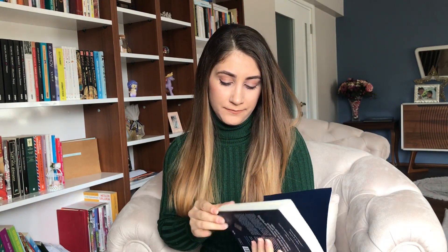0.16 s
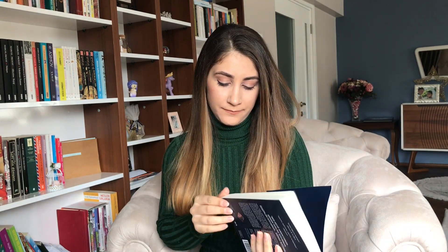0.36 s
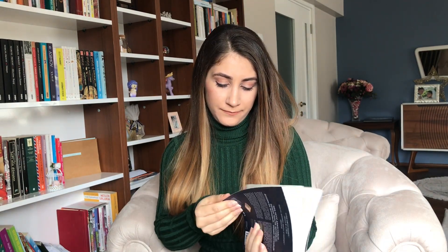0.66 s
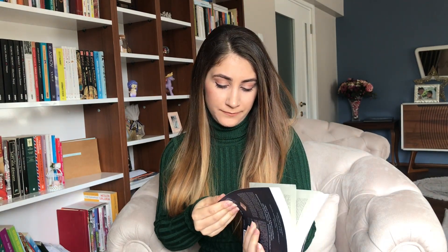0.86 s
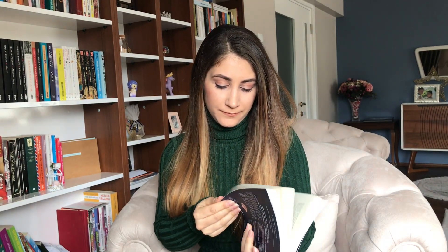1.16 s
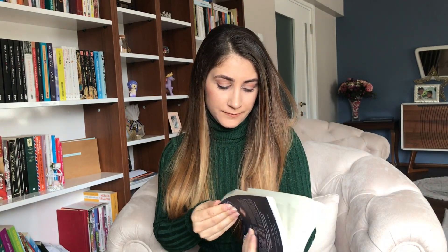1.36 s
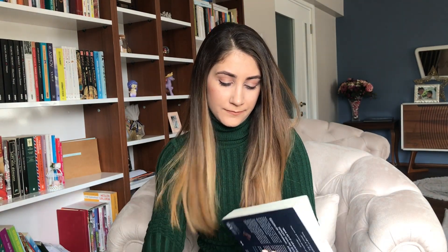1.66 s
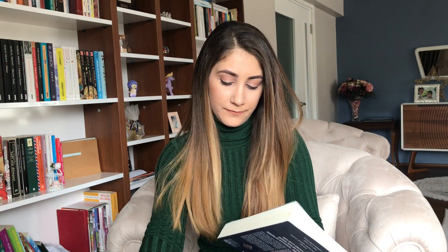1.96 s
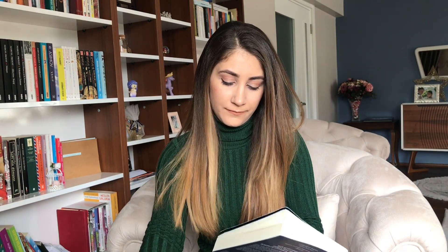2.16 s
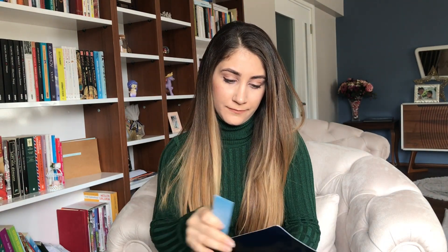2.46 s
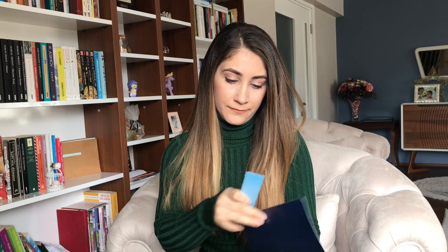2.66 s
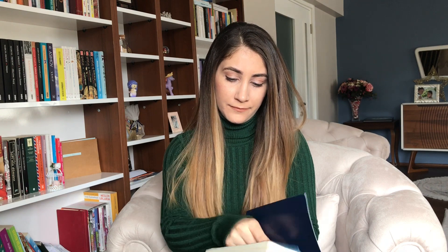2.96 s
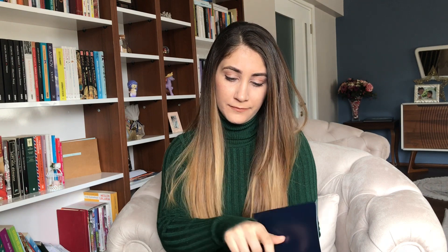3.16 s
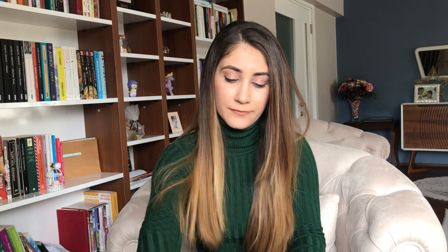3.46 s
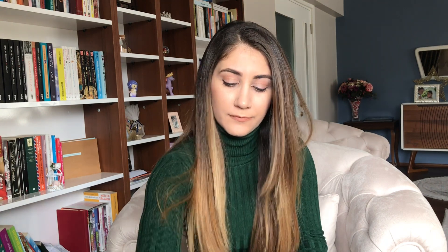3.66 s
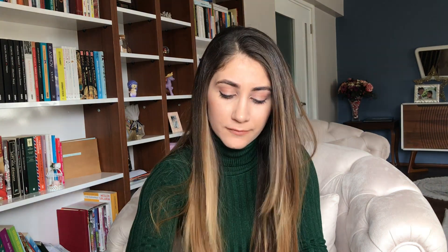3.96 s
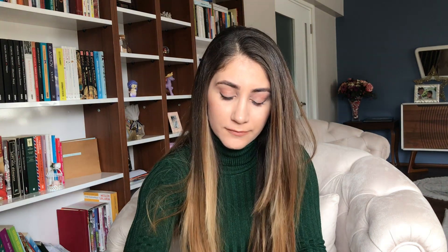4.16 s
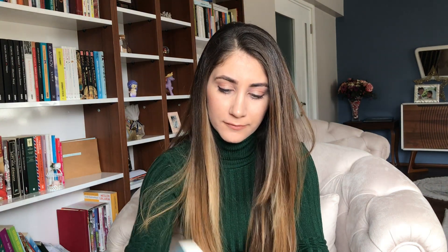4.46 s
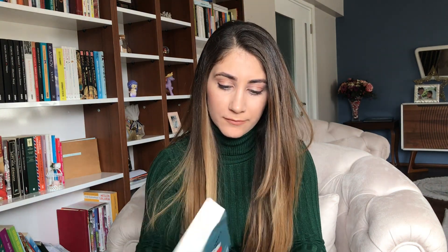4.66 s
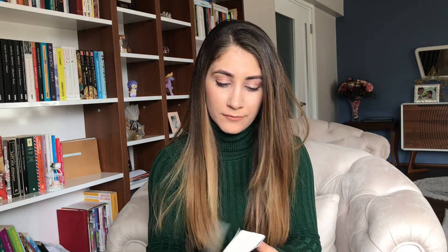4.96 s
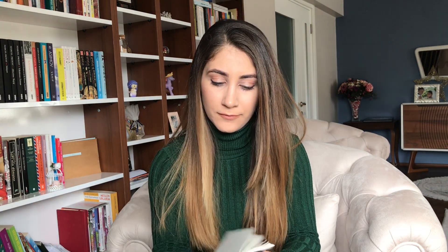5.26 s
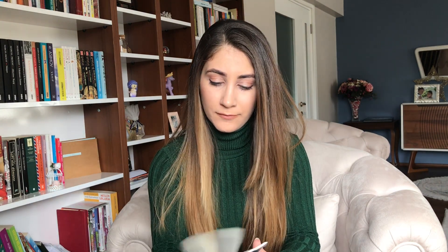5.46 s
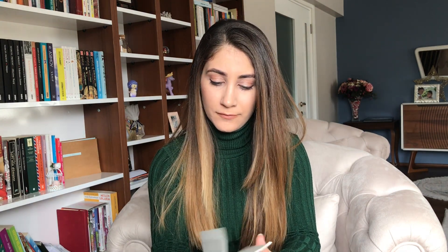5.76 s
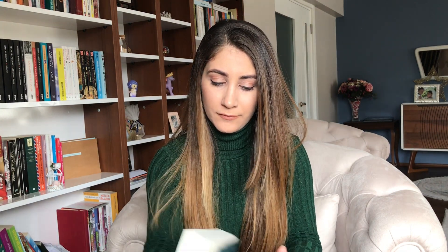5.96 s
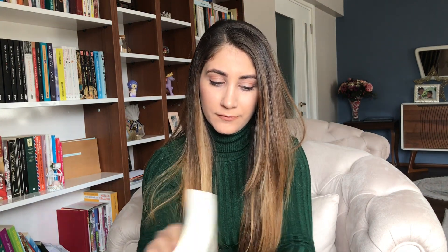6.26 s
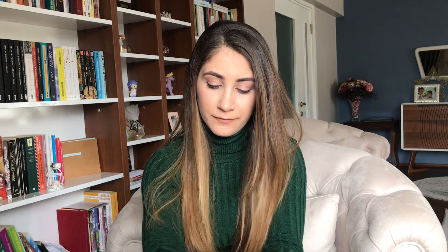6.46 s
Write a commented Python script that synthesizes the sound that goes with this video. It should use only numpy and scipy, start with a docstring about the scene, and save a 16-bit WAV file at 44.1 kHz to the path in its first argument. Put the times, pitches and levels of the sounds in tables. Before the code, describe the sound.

A paperback is leafed through, snapped shut and slid aside, another is handled quietly, ending with a heavy knock over faint low rumble.

```python
"""In a quiet living room a paperback is leafed through, shut and laid aside, and another book is picked up.
Paper and covers slide with a grainy hiss: random slips filtered by the resonances of sheet and cover.
Page edges snap as short cracks with damped cover modes; tiny ticks and narrow noise bands add bright detail.
The books bump as heavily damped swings, once with a loud thump and a low modal ring.
One echo and a sparse decaying tail answer each sound, over a steady low rumble of shaped noise."""
import sys
import numpy as np
from scipy import signal
from scipy.fft import rfft, irfft
from scipy.io import wavfile

SR = 44100
rng = np.random.default_rng(int(sys.argv[2]) if len(sys.argv) > 2 else 0)


def bounce(signal):
    """Save signal as a 16-bit WAV file at the path given by the first command-line argument."""
    frames = np.transpose(np.atleast_2d(signal))
    limited = np.clip(frames, -1, 1)
    pcm = np.round(limited * 32767).astype(np.int16)
    wavfile.write(sys.argv[1], SR, pcm)


N = 291501

# spectrum of a paper edge, struck or brushed: frequency_hz, density_db (per Hz)
EDGE_SPECTRUM = [(200, -21), (900, -5.5), (2000, -5.5), (3000, 3), (4500, -1), (6300, 1.5), (7600, -4),
                 (13000, -4.5), (16000, -9)]


def gain_of(db):
    """Level law: decibels to an amplitude ratio."""
    return 10 ** (np.asarray(db) / 20)


def evened(x):
    """Power normalization: scales a signal to an rms of one."""
    return x / np.sqrt(np.mean(x ** 2) + 1e-20)


def read(points, hz):
    """Interpolation of a spectrum on a log-frequency axis."""
    table_hz, value = np.transpose(points)
    return np.interp(np.log(hz + 1), np.log(table_hz + 1), value)


def add(mix, start_s, sound):
    """Superposition: adds a sound to the mix from its start time, cut at the end of the mix."""
    part = mix[max(round(start_s * SR), 0):][:len(sound)]
    part += sound[:len(part)]  # a view, so the mix itself changes


def seconds(length_s):
    """Time axis of a short sound."""
    return np.arange(max(int(length_s * SR), 2)) / SR


def coloured(x, points, tilt=0, sheet_hz=1000, sheet_db=0, sheet_octaves=0.31):
    """Linear filtering: a spectrum, a tilt in dB per octave above 1 kHz and one broad resonance; rms one."""
    hz = np.fft.rfftfreq(len(x), 1 / SR)
    octaves = np.log2(np.maximum(hz, 1000) / 1000)
    resonance = sheet_db * np.exp(-(np.log2((hz + 1) / sheet_hz) / sheet_octaves) ** 2)
    response_db = read(points, hz) + tilt * octaves + resonance
    return evened(irfft(rfft(x) * gain_of(response_db), len(x)))


def drift(size, rate_hz):
    """Slow random modulation: Gaussian values at the given rate, joined by straight lines."""
    knots = rng.standard_normal(N // 10)
    return np.interp(np.arange(size) * rate_hz / SR, np.arange(len(knots)), knots)


def page_slides():
    """Sliding friction under load: a page catches, slides under growing pressure and lets go."""
    # start_s, length_s, hiss_db (at full pressure), fizz_db and body_db (over the hiss), sheet_hz
    slides = [(0.589, 0.17, -71.5, -5, -6, 2900), (1.098, .16, -69.5, -23, -2.5, 2850),
              (1.442, .07, -66, -6, -1.5, 2800), (1.803, 0.22, -60, -3, -15.5, 4630),
              (2.041, 0.066, -66.5, -6, -17, 4600), (2.106, 0.2, -60.5, -7, -11, 4450),
              (2.844, 0.034, -53, -1.5, -15, 6100), (2.948, 0.042, -52, -10, -6, 3000),
              (2.996, 0.041, -57.5, -11, -7, 3200)]
    catch_s, release_s = 0.0057, 0.0094
    press_db, sheet_db = 4, 7.5  # growth of level over the slide, height of the sheet resonance
    out = np.zeros(N)
    for start_s, length_s, hiss_db, fizz_db, body_db, sheet_hz in slides:
        t = seconds(length_s + 5 * release_s)
        caught = np.minimum(t / catch_s, 1)
        released = np.exp(-np.maximum(t - length_s, 0) / release_s)
        level_db = hiss_db - press_db * np.maximum(1 - t / length_s, 0)
        add(out, start_s, caught * released * rub(level_db, fizz_db, body_db, sheet_hz, sheet_db))
    return out


def drags(edge_s=0.01):
    """Speed-dependent friction: a dragged cover speeds up and slows down, and its sound swells and fades."""
    # start_s, rise_s, fall_s, hiss_db (at full speed), fizz_db and body_db (over the hiss), cover_hz
    strokes = [(2.335, .03, 0.09, -72, -14, -3, 2980), (2.77, 0.055, .06, -71.5, 1, -3, 6000),
               (3.04, 0.036, 0.25, -66.5, -3, 1.5, 3600), (3.205, 0.0092, 0.16, -59, -13, -1, 2880),
               (3.64, 0.055, 0.14, -52, -1.5, 0, 1900), (3.83, 0.056, 0.16, -59.5, -4, -2, 3800),
               (3.97, .05, 0.28, -67, -3.5, -1.5, 5200), (4.07, 0.2, 0.25, -60, -2.5, -2.5, 5000),
               (4.28, 0.098, 0.13, -62, 5.5, -12, 5740), (4.57, 0.076, 0.49, -68, 1, -2.5, 3630),
               (4.89, 0.062, 0.095, -69, -3, 3, 3630), (5.19, 0.12, 0.21, -69, -1, 1.5, 3720),
               (5.43, 0.063, 0.076, -74.5, -1, 1, 3720), (5.82, 0.12, 0.068, -66, 5, -8, 3500),
               (5.98, 0.018, 0.44, -74, 0.5, 5, 3500), (6.174, 0.012, 0.094, -64.5, 4.5, 0, 4000),
               (6.285, 0.12, 0.11, -58.5, 2, -0.5, 4400), (6.492, .006, 0.089, -54, -1.5, -7, 3650)]
    start_db, end_db = -9.5, -16  # relative to full speed
    resonance_db = 5
    out = np.zeros(N)
    for start_s, rise_s, fall_s, hiss_db, fizz_db, body_db, cover_hz in strokes:
        t = seconds(rise_s + fall_s)
        contact = np.minimum(np.minimum(t, t[-1] - t) / edge_s, 1)
        level_db = hiss_db + np.interp(t, [0, rise_s, rise_s + fall_s], [start_db, 0, end_db])
        add(out, start_s, contact * rub(level_db, fizz_db, body_db, cover_hz, resonance_db))
    return out


def rub(level_db, fizz_db, body_db, sheet_hz, sheet_db):
    """Source and filter: slips sound in the sheet and the cover, finer ones in the fibres."""
    # spectra of the sliding sheet, its fine fibres and the cover: frequency_hz, density_db (per Hz)
    hiss_spectrum = [(1200, -22), (2200, -6), (3000, 2.5), (4400, 2.5), (5200, -1), (6400, 3.5), (7600, -7),
                     (10000, -17)]
    fizz_spectrum = [(5000, -31), (7400, -2.5), (9000, 5.5), (10400, -2.5), (12300, 6.5), (14200, 3.5),
                     (16000, -2)]
    body_spectrum = [(120, -17), (280, 13.5), (450, 4), (680, 4.5), (1000, 3.5), (1400, -1.5), (2000, -3),
                     (3200, -30)]
    drive = friction(len(level_db), grain=0.27)
    fibres = friction(len(level_db), slips_per_s=450, grain=0.4)
    sound = coloured(drive, hiss_spectrum, 0, sheet_hz, sheet_db)
    sound += gain_of(fizz_db) * coloured(drive + fibres, fizz_spectrum)
    sound += gain_of(body_db) * coloured(drive, body_spectrum)
    return gain_of(level_db) * sound


def friction(size, slips_per_s=900, spread_db=3.0, grain=.5, patchy_db=2.77):
    """Stick-slip: fibres give separate tiny clicks in a smooth hiss, under uneven pressure."""
    slips = (rng.random(size) < slips_per_s / SR) * rng.choice([-1, 1], size)
    slips = slips * gain_of(spread_db * np.minimum(rng.exponential(1, size), 4))
    share = np.clip(grain, 0, 1)  # part of the power that lies in the clicks
    drive = np.sqrt(share) * evened(slips) + np.sqrt(1 - share) * rng.standard_normal(size)
    return drive * gain_of(patchy_db * drift(size, 111.3))


def brushes(rise_s=0.0029):
    """Transient friction: a page edge sweeps past in a quick burst."""
    # start_s, level_db, length_s, brightness_db (per octave)
    sweeps = [(0.008, -62, 0.012, -4), (0.068, -64, .035, -10.5), (0.223, -65.5, 0.02, 0),
              (0.716, -64.5, .025, -6), (0.793, -64, 0.017, -2.5), (1.094, -60.5, 0.013, -5.5),
              (1.426, -60.5, 0.011, -10), (1.774, -47, 0.014, 2.5), (1.79, -46, .012, 1),
              (1.976, -51, 0.024, 5), (2.106, -54.5, 0.019, 2.5), (2.187, -51, 0.025, 3),
              (2.285, -46.5, 0.027, 1.5), (2.609, -68, 0.031, -9), (3.656, -50.5, 0.05, -2.5),
              (4.384, -48, 0.018, 11), (6.58, -56, 0.024, -1)]
    sheet_hz, sheet_db = 4080, 3.5  # broad resonance of the sheet
    out = np.zeros(N)
    t = seconds(.1)
    for start_s, level_db, length_s, tilt in sweeps:
        shape = (1 - np.exp(-t / rise_s)) * np.exp(-(t / length_s) ** 4)
        rubbing = coloured(friction(len(t), grain=0.23), EDGE_SPECTRUM, tilt, sheet_hz, sheet_db)
        add(out, start_s, gain_of(level_db) * shape * rubbing)
    return out


def tick_trains(spread_db=3, low_hz=4500, high_hz=14000, tick_s=.00009):
    """Random impulse train: tiny bright ticks of differing pitch and size, dense as pages run past, sparse later."""
    # start_s, end_s, ticks_per_s, level_db (before the spread of sizes)
    trains = [(1.824, 2.05, 200, -47), (2.109, 2.29, 220, -47), (2.938, 3.102, 140, -50),
              (3.699, 4.418, 110, -52), (4.6, 5.722, 31, -54.5)]
    out, t = np.zeros(N), seconds(.003)
    for start_s, end_s, ticks_per_s, level_db in trains:
        duration_s = end_s - start_s
        for place, pitch, size in rng.random((200, 3))[:int(ticks_per_s * duration_s)]:
            hz = low_hz + (high_hz - low_hz) * pitch
            envelope = t / tick_s * np.exp(1 - t / tick_s)
            tick = envelope * np.sin(2 * np.pi * hz * t)
            tick_db = level_db + spread_db * np.log(size + 0.018)
            add(out, start_s + place * duration_s, gain_of(tick_db) * tick)
    return out


def narrow_bands():
    """Narrow-band noise: two faint squeaks near 3.7 kHz, and one short tick near 1.2 and 3.4 kHz."""
    # start_s, level_db, pitch_hz, width_octaves (from the pitch to 18 dB down), length_s
    bands = [(1.617, -81.5, 3680, 0.082, .135), (3.85, -67, 3630, 0.276, 0.073),
             (5.926, -51.5, 3400, 0.3, 0.009), (5.927, -54.5, 1210, 0.63, 0.014)]
    out = np.zeros(N)
    for start_s, level_db, hz, octaves, length_s in bands:
        t = seconds(length_s)
        spectrum = [(hz / 4 ** octaves, -50), (hz / 2 ** octaves, -18), (hz, 0),
                    (hz * 2 ** octaves, -18), (hz * 4 ** octaves, -50)]
        noise = coloured(rng.standard_normal(len(t)), spectrum)
        add(out, start_s, gain_of(level_db) * noise * signal.windows.tukey(len(t), .5))
    return out


def snaps(send_db=-1):
    """Impulsive release: an edge cracks and the cover rings. Returns the direct sound and the room's drive."""
    # start_s, crack_db (on top of the burst's own rms), ring_db, brightness_db (per octave),
    # grip (factor on the cover's pitch)
    releases = [(0.0955, -47.5, -49.5, -3.5, 0.94), (1.099, -48.5, -67, -5.5, .87),
                (1.4265, -48, -58, -8, 1.1), (1.5109, -37.5, -52.5, -4.5, 0.52),
                (1.595, -49, -59, -7, 0.71), (2.037, -39.5, -58, -2, 1.05), (2.3333, -21, -43, 2, 0.88),
                (2.342, -35, -53, -5, 0.66), (2.887, -25, -38, -4, 1.08), (2.95, -39, -45.5, -4, 1),
                (3.08, -40.5, -55, -2, 0.72), (3.095, -42.5, -62, -3, 0.76), (3.1403, -31, -43, -5, 0.93),
                (3.2053, -29, -41, -2, 1.03), (3.2161, -27.5, -37.5, -2, 1.04),
                (3.689, -30.5, -45, 1, 1.49), (3.6912, -24, -65, -3, 1.4), (3.746, -34, -51, 0, 1.03),
                (3.8349, -29.5, -44.5, -5, 0.85), (4.589, -44.5, -58, 1, .82),
                (4.87, -44.5, -56.5, -2.5, 0.92), (4.899, -40.5, -53.5, -4, 0.74),
                (5.101, -47, -66, 11, 1.3), (5.369, -43.5, -66, 3, 2.3), (5.54, -48.5, -61, -4.5, 0.76),
                (5.569, -69, -54.5, 3, .91), (5.632, -62, -55.5, 3, 1.06), (5.9267, -37, -51.5, -2, 1.64),
                (6.019, -51, -54, -3, 0.86), (6.46, -40, -48, -1, 0.93), (6.4971, -31, -40, -9, 1.44),
                (6.5129, -32.5, -41, -6.5, 0.59), (6.54, -43, -87, -4, 1.5)]
    # modes of the stiff cover: frequency_hz, level_db, t60_s
    cover_modes = [(442, -15, 0.076), (730, -16.5, 0.052), (759, -4, 0.041), (1294, -16, 0.096),
                   (1433, -14, 0.083), (1803, -15.5, 0.056), (2880, -11, 0.01)]
    direct, spread, t = np.zeros(N), np.zeros(N), seconds(.08)
    lead = 64  # samples ahead of the click, room for the filter's pre-ringing
    for start_s, crack_db, ring_db, tilt, grip in releases:
        burst = np.roll(crackle(len(t)), lead)
        size = gain_of(crack_db) * burst.std()
        add(direct, start_s - lead / SR, size * coloured(burst, EDGE_SPECTRUM, tilt))
        # the room is driven by a plain click of matching level, for a smoothly coloured tail
        click = coloured(signal.unit_impulse(len(t), lead), EDGE_SPECTRUM, tilt)
        add(spread, start_s - lead / SR, size * gain_of(send_db) * click)
        cover = gain_of(ring_db) * ring(cover_modes, t, grip)
        add(direct, start_s, cover)
        add(spread, start_s, cover)
    return direct, spread


def crackle(size, crack_s=0.0011, crack_db=-11, flutter_db=-25, flutter_s=0.0046):
    """Two-rate decay: a sharp release, then the fast chatter and the slower flutter of the sheet."""
    t = np.arange(size) / SR
    shape = gain_of(crack_db) * np.exp(-t / crack_s) + gain_of(flutter_db) * np.exp(-t / flutter_s)
    burst = shape * rng.choice([-1, 1], size)
    burst[0] = 1.5  # the release itself
    return burst


def ring(modes, t, stretch=1):
    """Modal superposition: exponentially damped sines after one blow."""
    return sum(gain_of(db - 60 * t / t60) * np.sin(2 * np.pi * hz * stretch * t) for hz, db, t60 in modes)


def bumps(fullness=0.59, shudder_db=-16.0, shudder_s=0.033):
    """Heavy damping: a block of pages swings only a few times; the loose leaves shudder after it."""
    # start_s, level_db (of the swing at the pitch), pitch_hz, length_s, hardness_db (per octave)
    contacts = [(0.085, -51.5, 436, 0.0081, 2), (0.1, -38.5, 555, .0095, 0.5), (3.139, -48, 166, 0.015, -1),
                (3.746, -48, 338, .012, -4), (4.451, -53.5, 328, .013, 0), (5.28, -45, 380, 0.0086, -11),
                (5.313, -47, 335, .0056, -12), (5.364, -49.5, 373, 0.0081, 5), (6.005, -50, 320, 0.0115, 9),
                (6.032, -51, 264, 0.0215, -12), (6.199, -48.5, 310, .01, -5), (6.503, -29, 388, 0.0065, 8),
                (6.5118, -18, 279, 0.0092, -7.5)]
    # low ring of the furniture under the heavy book: frequency_hz, level_db, t60_s
    furniture_modes = [(61, -44, .2), (82, -29, 0.23), (113, -30.5, 0.29), (178, -40, 0.16),
                       (242, -34, 0.17), (296, -40, 0.097), (435, -32, 0.062)]
    landing_s = 6.514
    board_ratio, board_db = 2.03, -13  # the board swings above the pitch, more so in a hard contact
    spine_ratio, spine_db = 0.49, -12  # the heavy spine swings below it
    out = np.zeros(N)
    for start_s, level_db, hz, length_s, hardness in contacts:
        t = seconds(length_s)
        phase = 2 * np.pi * hz * (t - length_s / 2)
        board = gain_of(board_db + hardness / 2) * np.sin(board_ratio * phase)
        spine = gain_of(spine_db) * np.sin(spine_ratio * phase)
        window = signal.windows.tukey(len(t), np.clip(fullness, 0, 1))
        swing = -(np.sin(phase) + board + spine) * window
        add(out, start_s, gain_of(level_db) * swing)
        t = seconds(0.25)
        # a harder contact reaches further above the pitch
        spectrum = [(hz / 4, -8), (hz, 0), (hz * 2, -7 + hardness), (hz * 4, -24 + 2 * hardness), (hz * 20, -60)]
        leaves = coloured(rng.standard_normal(len(t)), spectrum)
        shudder = np.minimum(2 * t / length_s, 1) * np.exp(-t / shudder_s)
        add(out, start_s, gain_of(level_db + shudder_db) * leaves * shudder)
    t = seconds(.4)
    add(out, landing_s, -ring(furniture_modes, t) * (1 - np.exp(-t / 0.0028)))
    return out


def room(direct, spread, wet_db, echo_db, echo_s=.0073):
    """Reverberation: one echo from a nearby surface, then sparse reflections dying band by band."""
    # decay time of the room: frequency_hz, t60_s
    decay_times = [(100, 1), (400, 0.25), (1200, 0.4), (4000, 0.35), (8000, 0.25), (14000, 0.15)]
    size = SR // 2
    taps = rng.standard_normal(size) * (rng.random(size) < .1)
    taps = taps * (np.arange(size) > echo_s * SR)
    hz, t, bands = signal.stft(taps, SR, nperseg=256)
    decay = gain_of(-60 * t / read(decay_times, hz)[:, None])
    tail = signal.istft(bands * decay, SR, nperseg=256)[1]
    out = direct + gain_of(wet_db) * signal.fftconvolve(spread, tail / np.linalg.norm(tail))[:N]
    add(out, echo_s, gain_of(echo_db) * direct)
    return out


def background():
    """Stationary shaped noise: a steady low rumble and faint hiss."""
    # spectrum of the room's background: frequency_hz, density_db (per Hz)
    floor_spectrum = [(20, -16), (42, 1.5), (60, -5.5), (92, 4), (140, -10), (250, -11), (450, -21.5),
                      (700, -26), (1000, -25), (2000, -32.5), (5000, -35.5), (10000, -39.5), (13000, -37.5),
                      (16000, -40)]
    level_db = -58.5
    return gain_of(level_db) * coloured(rng.standard_normal(N), floor_spectrum)


def scene():
    """Superposition of paper, edges and books, each with its room response, over the background."""
    rubbing = page_slides() + drags() + brushes() + tick_trains() + narrow_bands()
    thuds = bumps()
    paper = room(rubbing, rubbing, wet_db=-13, echo_db=-33)
    edges = room(*snaps(), wet_db=-9.0, echo_db=-12)
    books = room(thuds, thuds, wet_db=-14.0, echo_db=-33)
    return (paper + edges + books + background())[None]


def record(dry):
    """Band limitation: a linear-phase low-pass filter."""
    edge_hz = 16000
    low_pass = signal.firwin(511, edge_hz, window=("kaiser", 9), fs=SR)
    return signal.oaconvolve(dry, low_pass[None], "same")


dry = scene()
out = record(dry)
bounce(out)
```